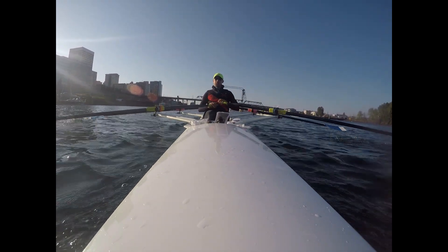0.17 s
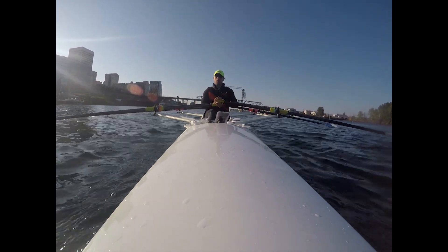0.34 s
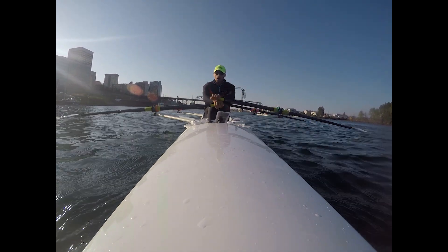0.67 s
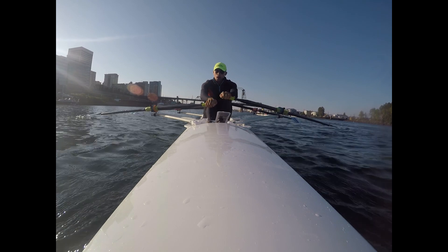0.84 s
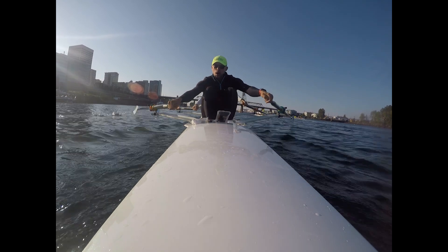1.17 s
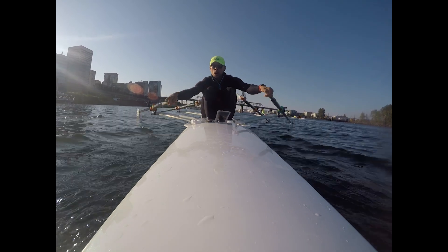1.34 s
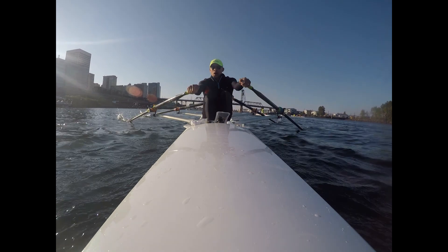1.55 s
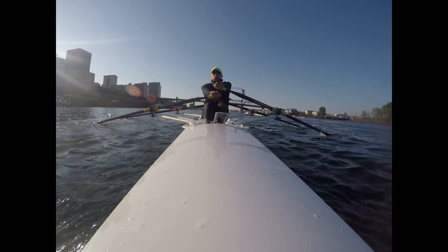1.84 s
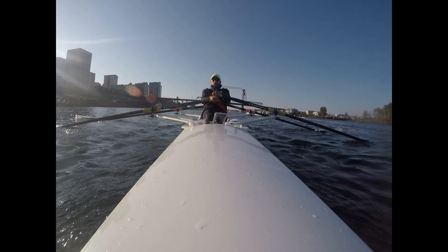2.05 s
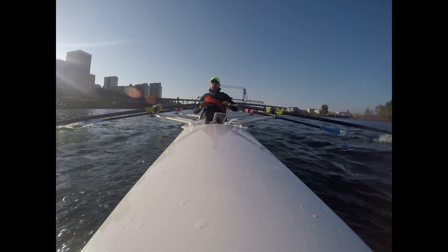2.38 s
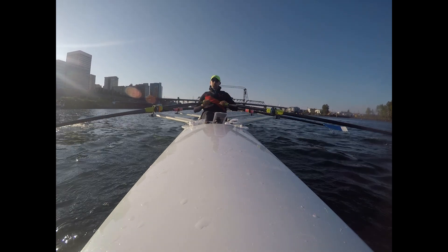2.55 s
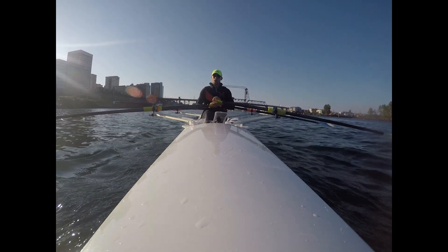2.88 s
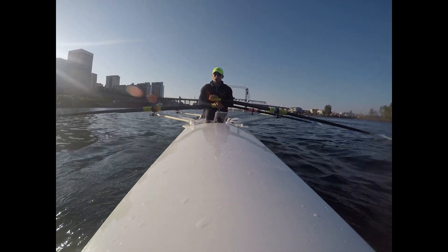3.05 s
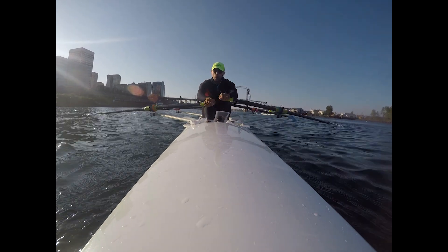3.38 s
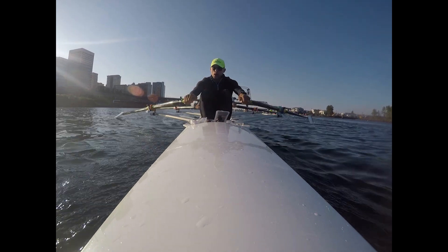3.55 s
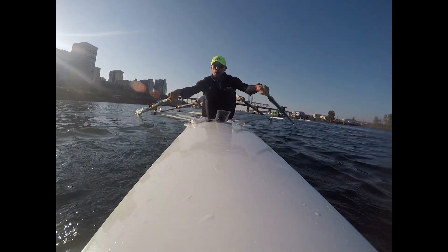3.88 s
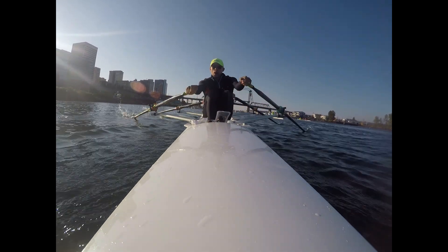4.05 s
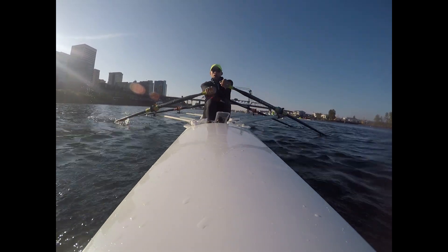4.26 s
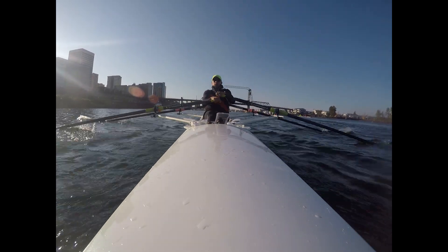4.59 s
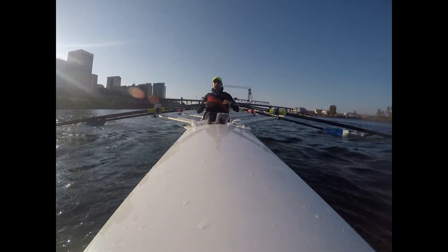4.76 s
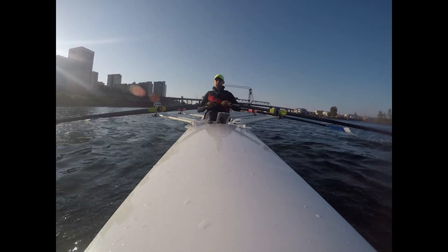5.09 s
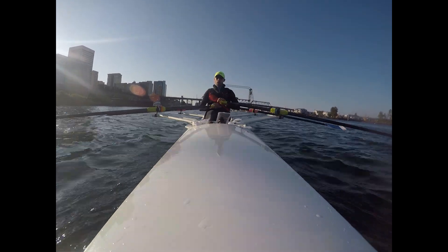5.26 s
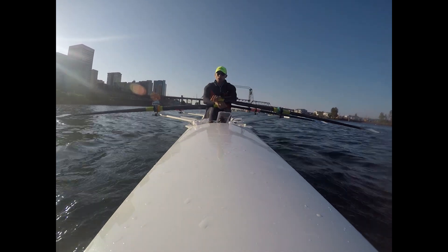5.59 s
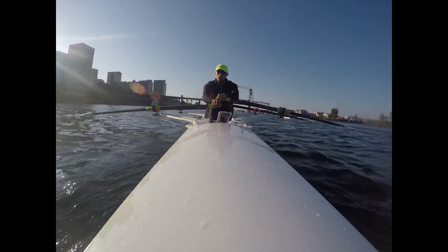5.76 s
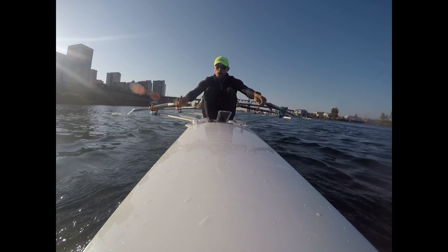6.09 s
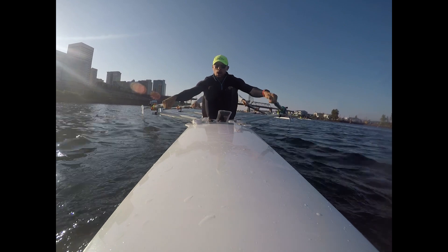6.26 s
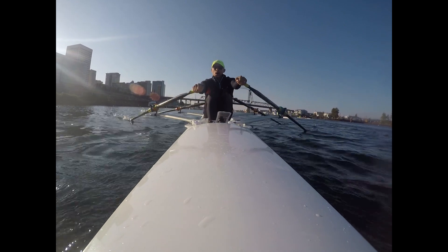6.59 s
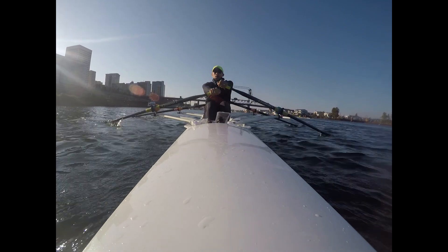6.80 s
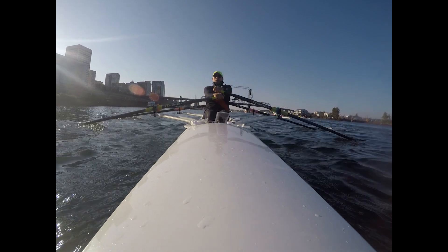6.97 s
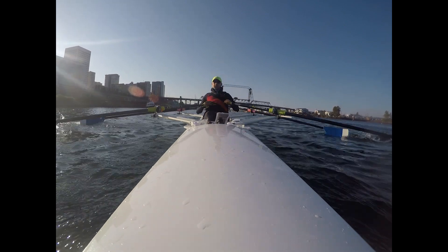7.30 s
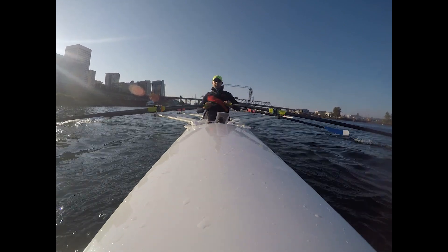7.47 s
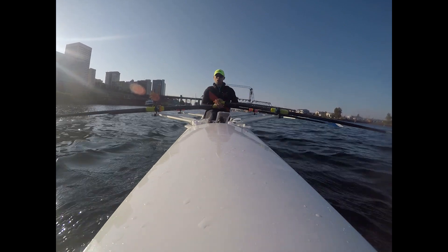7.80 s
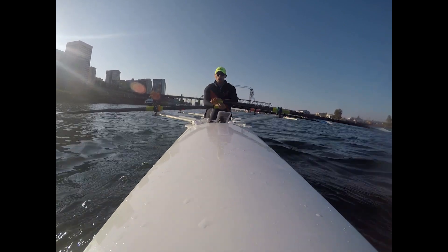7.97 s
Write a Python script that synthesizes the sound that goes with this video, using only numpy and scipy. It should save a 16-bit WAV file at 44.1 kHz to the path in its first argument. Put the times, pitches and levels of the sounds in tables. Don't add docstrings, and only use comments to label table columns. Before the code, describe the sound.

Muffled low rumble and water rushing under a rowing shell, swelling with each stroke, with dull oarlock knocks, hollow booms, bubbling pings and light drips.

```python
import sys
import numpy as np
from scipy import signal
from scipy.io import wavfile
from scipy.ndimage import uniform_filter1d, minimum_filter1d

SR = 44100
rng = np.random.default_rng(int(sys.argv[2]) if len(sys.argv) > 2 else 0)


def voltage_ratio(decibels):
    exponent = np.asarray(decibels, float) / 20
    return 10 ** exponent


def materialize(psi):
    bounded = np.clip(np.atleast_2d(psi).T, -1, 1)
    quanta = np.round(bounded * 32767).astype(np.int16)
    wavfile.write(sys.argv[1], SR, quanta)


N = 358974

# f/Hz, width/Hz, level/dB
DECK_MODES = [(112.2, 30.2, 1), (144, 27, 2), (198.3, 62.8, -3.5), (263.6, 48, -11.5), (316.4, 29, -12.5),
              (369.8, 41, -16), (422, 38.5, -10.5), (467.6, 52, -12.5), (511.2, 80, -14)]
# f/Hz, width/Hz, level/dB
SKIN_MODES = [(707, 85, -1), (875, 170, 0.5), (1060, 200, 1.5), (1324.5, 88, -0.5), (1487, 150, -2),
              (1656, 204, -4.5), (2037, 220, -9)]
# f/Hz, width/Hz, level/dB
MOUNT_MODES = [(2530, 450, -5), (2913, 260, -1), (3100, 280, 2), (3480, 260, -6.5), (3907, 180, -9.5),
               (4780, 240, -19.5)]
# f/Hz, width/Hz, level/dB
HOUSING_MODES = [(4800, 230, 1), (5800, 680, -3.5), (6250, 600, -1), (7420, 2700, -9), (8540, 150, -1.5),
                 (9200, 3700, -6.5), (12800, 3500, -16)]


def in_time(rows):
    t_s, level_db = np.transpose(rows)
    return np.interp(np.arange(N) / SR, t_s, level_db)


def swells(rows, curve):
    t, out = np.arange(N) / SR, np.zeros(N)
    for peak_s, db, rise_s, fall_s in rows:
        rising = 1 + (t - peak_s) / rise_s
        falling = 1 - (t - peak_s) / fall_s
        near = np.where(t < peak_s, rising, falling)
        out = np.maximum(out, db * np.clip(near, 0, 1) ** curve)
    return out


def rms_one(x):
    return x / np.sqrt(np.mean(x ** 2) + 1e-20)


def wander(spread_db, rate_hz):
    hop, settle = 40, 2000
    r = np.exp(-2 * np.pi * rate_hz * hop / SR)
    noise = rng.standard_normal(N // hop + settle + 2)
    slow = signal.lfilter([1], [1, -2 * r, r * r], noise)[settle:]
    return np.interp(np.arange(N) / hop, np.arange(len(slow)), voltage_ratio(spread_db * rms_one(slow)))


def turbulence(gust_db, rate_hz, grain_db):
    grains = voltage_ratio(grain_db * np.minimum(rng.exponential(1, N), 5))
    return rng.standard_normal((2, N)) * wander(gust_db, rate_hz) * grains


def resonate(x, hz, width_hz):
    r = np.exp(-np.pi * width_hz / SR)
    stage = [(1 - r * r) / 2, 0, (r * r - 1) / 2, 1, -2 * r * np.cos(2 * np.pi * hz / SR), r * r]
    return signal.sosfilt([stage, stage], x)


def band(x, low_hz, high_hz):
    return signal.sosfilt(signal.butter(2, [low_hz, high_hz], "band", fs=SR, output="sos"), x)


def body(forces, modes, patchy_db, rate_hz):
    out = 0
    for k, (hz, width_hz, db) in enumerate(modes):
        force = forces[k % 2] * wander(patchy_db, rate_hz)
        warmed = np.r_[force[-SR // 5:], force]
        out = out + voltage_ratio(db) * resonate(warmed, hz, width_hz)
    return out[-N:]


def add_at(out, t_s, sound):
    i = round(t_s * SR)
    out[i:i + len(sound)] += sound[:N - i]


def struck(events, modes, low_hz, high_hz, blow, spread_db):
    attack_s = 0.003
    out, t = np.zeros(N), np.arange(SR // 8) / SR
    for t_s, peak_db, length_s in events:
        force = rng.standard_normal(len(t)) * np.exp(-t / length_s)
        force *= 1 - np.exp(-t / min(attack_s, length_s / 3))
        force[:3] += blow
        strengths = voltage_ratio(spread_db * rng.standard_normal(len(modes)))
        ring = 0
        for k, (hz, width_hz, mode_db) in enumerate(modes):
            gain = (-1) ** k * strengths[k] * voltage_ratio(mode_db)
            ring = ring + gain * resonate(force, hz, width_hz)
        ring = band(ring, low_hz, high_hz)
        add_at(out, t_s, voltage_ratio(peak_db) * ring / np.abs(ring).max())
    return out


def steadied(x, share):
    height = np.sqrt(uniform_filter1d(rms_one(x) ** 2, size=1500) + 0.029)
    return x / height ** share


def gurgles(per_s, size_db):
    out = 0
    for hz, width_hz, db in SKIN_MODES:
        bursts = rng.random(N) < per_s / SR
        sizes = voltage_ratio(db + size_db + 3.5 * np.minimum(rng.exponential(1, N), 3))
        out = out + resonate(bursts * sizes + 1e-18, hz, width_hz * 0.88)
    return out


def shaking():
    # f/Hz, width/Hz, level/dB
    bending_modes = [(29.44, 15.9, -2.5), (51.1, 10.6, 0.5), (69.9, 38.6, -11.5)]
    # t/s, level/dB
    heave = [(0.0, -9), (0.2, -17), (0.79, -22.5), (1.2, -9.5), (1.88, -20), (2.63, -12), (2.72, -20),
             (2.79, -12.5), (3.04, -21.5), (3.11, -15), (4.4, -16), (4.44, -21), (4.85, -12.5), (5.69, -21),
             (6.03, -12.5), (6.87, -20.5), (7.44, -14.5), (8.14, -18.5)]
    # t/s, level/dB
    flow = [(0.0, -39.5), (0.27, -41.5), (1.09, -32.5), (1.27, -41.5), (1.56, -45), (2.36, -32.5),
            (2.54, -41), (2.76, -42), (3.56, -33), (3.94, -43), (4.83, -32.5), (5.1, -42.5), (6.12, -34.5),
            (6.28, -40.5), (6.6, -44), (7.25, -32), (7.51, -41.5), (8.14, -38)]
    # peak t/s, strength/dB, build-up/s, release/s
    jolts = [
        (1.13, 14, 0.22, 0.2),
        (2.36, 14.5, 0.23, .08),
        (2.44, 9, 0.11, 0.17),
        (3.75, 13, 0.27, 0.15),
        (4.74, 16, 0.098, 0.051),
        (4.92, 14, 0.23, 0.23),
        (5.09, 3.5, 0.11, 0.087),
        (6.22, 14, 0.32, 0.14),
        (7.23, 13, 0.1, 0.07),
        (7.41, 16.5, 0.25, 0.2),
    ]
    # peak t/s, strength/dB, build-up/s, release/s
    waves = [(0.45, 1, .05, .05), (1.64, 2, .02, .06), (1.84, 6, 0.04, 0.095), (2.12, 1.5, .03, 0.033),
             (2.9, 2.5, 0.11, 0.045), (3.18, 2.5, 0.037, 0.04), (4.22, 2, .08, .06), (4.36, 4, 0.14, 0.042),
             (5.09, 1, .06, 0.07), (5.22, 1, 0.066, 0.088), (5.45, 0.5, 0.046, 0.065),
             (5.75, 3, 0.11, 0.091), (6.87, 4.5, 0.049, 0.057), (7.73, 3.5, .02, 0.19),
             (7.99, -0.5, .04, 0.065)]
    # deepest t/s, depth/dB, settling/s, recovery/s
    lulls = [
        (0.2, 4.5, .4, .5),
        (1.4, 0, .12, .3),
        (2.65, 4.5, .1, 0.089),
        (4.15, 1.5, .2, 0.4),
        (5.3, 6, .15, 0.43),
        (6.45, 0.5, .1, 0.22),
        (7.7, 3.5, .15, 0.16),
        (8.05, 3, .2, 0.26),
    ]
    jolt_db = swells(jolts, curve=1.35)
    flow_db = in_time(flow)
    flow_db = flow_db - flow_db.mean() + swells(waves, curve=0.82)

    bending_db = in_time(heave) + 0.26 * jolt_db
    deck_db = -23 + 0.51 * flow_db + 0.95 * jolt_db - swells(lulls, curve=0.88)
    skin_db = -38.5 + flow_db + 0.19 * jolt_db
    mount_db = -51.5 + 0.9 * flow_db + 0.15 * jolt_db

    swell = body(turbulence(0.9, 6.7, 0.1), bending_modes, patchy_db=1.36, rate_hz=3.0)
    bending = steadied(swell - uniform_filter1d(swell, size=2200), share=0.73)
    wash = turbulence(1.1, 28, 2.6)
    deck = body(wash, DECK_MODES, patchy_db=2.5, rate_hz=8.0)
    skin = body(wash, SKIN_MODES, patchy_db=2.0, rate_hz=11) + gurgles(per_s=6, size_db=30.5)
    mount = body(wash, MOUNT_MODES, patchy_db=1.5, rate_hz=45)

    low = voltage_ratio(bending_db) * rms_one(bending) + voltage_ratio(deck_db) * rms_one(deck)
    high = voltage_ratio(skin_db) * rms_one(skin) + voltage_ratio(mount_db) * rms_one(mount)
    return low + high


def hiss():
    # peak t/s, strength/dB, build-up/s, release/s
    hiss_swells = [(1.06, 6, .8, 0.091), (2.36, 9.5, 0.78, 0.04), (2.54, 5.5, .06, .04), (2.72, 5, 0.022, .09),
                   (3.06, 5.5, 0.025, .05), (3.61, 5.5, 0.76, .45), (4.79, 9, .9, .18), (5.73, 4.5, 0.27, .3),
                   (6.18, 5, 0.97, 0.042), (6.4, 6, .1, .05), (7.34, 9, 1.0, 0.077), (8.3, 4.5, 0.74, .1)]
    air = body(turbulence(0.35, 30, 0.8), HOUSING_MODES, patchy_db=0.3, rate_hz=11)
    air = band(air, 3800, 13000)
    return voltage_ratio(-71 + swells(hiss_swells, curve=1.4)) * rms_one(air)


def ticks():
    # t/s, peak/dB
    drops = [(0.0238, -51), (1.425, -51), (1.037, -40.5), (1.1278, -45), (1.1688, -47.5), (1.2428, -52),
             (2.3047, -48), (2.4882, -57), (2.5122, -50), (2.5331, -52), (2.7268, -48), (3.047, -50),
             (3.5448, -57), (3.5766, -50), (3.7039, -53), (3.7507, -54), (3.9162, -45.5), (4.8196, -49),
             (4.8746, -44), (4.9945, -54), (6.003, -47), (6.195, -56), (6.2198, -54), (6.3965, -47),
             (7.2888, -50), (7.3166, -47), (7.3602, -50), (7.4006, -49), (7.4185, -54), (7.4405, -51)]
    events = [(t_s, db - 2.5, 0.003) for t_s, db in drops]
    return struck(events, HOUSING_MODES, 3600, 10500, blow=1.1, spread_db=2.2)


def pings():
    # t/s, peak/dB, f/Hz
    bubbles = [(0.443, -18.5, 1140), (0.67, -23, 1060), (0.744, -17, 1115), (2.896, -24, 2040),
               (1.125, -13, 859), (1.168, -21, 866), (3.155, -24, 3100), (1.634, -18.5, 1066),
               (1.809, -19, 970), (2.301, -5.5, 954), (2.366, -2.5, 1494), (3.185, -12.5, 1126),
               (3.344, -11, 1085), (3.387, -16, 1130), (3.611, -12, 918), (3.701, -10, 950),
               (4.472, -17, 900), (4.701, -25, 965), (5.195, -23, 2040), (4.872, -20, 970),
               (5.703, -17, 980), (6.092, -13, 885), (6.201, -4.5, 1354), (6.836, -26, 1060),
               (6.995, -16, 1095), (7.171, -22, 925), (7.224, -7, 875), (5.445, -19, 1060),
               (5.258, -22, 2040), (7.401, -7, 1330)]
    out, t = np.zeros(N), np.arange(SR // 10) / SR
    for t_s, db, hz in bubbles:
        t60_s = 45 / hz
        shape = (1 - np.exp(-t / 0.0035)) * voltage_ratio(db - 2.5 - 60 * t / t60_s)
        add_at(out, t_s, shape * np.sin(2 * np.pi * hz * t * (0.98 + 1.1 * t)))
    return out


def knocks():
    # t/s, peak/dB, bright part/dB
    hull_knocks = [(0.98, -16, -11), (1.052, -23, -8), (1.126, -7, -5.5), (1.136, 4, -29), (1.189, -10, -27),
                   (1.239, -7, -15.5), (2.112, -20, -8), (2.208, -8.5, -17.5), (2.302, -11.5, -12),
                   (2.363, -0.5, -13), (3.608, -9, -11.5), (3.694, -7, -20), (3.752, -7.5, -16.5),
                   (4.722, -10, -15), (4.813, -2.5, -15), (4.871, -2.5, -10.5), (4.932, -10, -8.5),
                   (4.956, -6.5, -32), (5.956, -17.5, -24), (6.101, -9, -17.5), (6.195, -6, -7.5),
                   (6.218, -10.5, -13.5), (7.15, -19.5, -11.5), (7.17, -13.5, -16), (7.225, -7.5, -21),
                   (7.309, -7, -12), (7.355, -0.5, -19), (7.395, -7.5, -10), (7.422, -15, -9),
                   (7.473, -16.5, -18),
                   (0.74, -23.5, 1), (0.893, -17.5, -13), (1.168, -19.5, -5.5), (1.422, -22.5, -11),
             (1.504, -16, -22), (2.186, -12.5, -20), (2.468, -17, -15), (2.511, -17, -10),
             (2.531, -16, -17), (2.723, -16.5, -21), (2.39, -8.5, -8), (3.09, -15.5, -11.5),
             (3.174, -32, -10), (3.344, -19.5, -10), (3.724, -15, -1.5), (3.912, -30, -3),
             (4.373, -13, -37), (4.772, -25, -3), (4.993, -15.5, -14), (5.417, -23, -8), (5.677, -25, -10),
             (5.698, -28.5, -0.5), (5.744, -25.5, 6.5), (5.843, -25, -6), (5.932, -18, -14),
             (6.067, -22, -7), (6.382, -36, -19), (6.415, -21.5, -21), (6.716, -20, -11),
             (7.976, -23.5, -8)]
    # f/Hz, width/Hz, level/dB
    bracket_modes = [(4670, 350, -14.5)]
    t_s, peak_db, bright_db = np.transpose(hull_knocks)
    thin_db = -24.5 + 0.67 * (bright_db + 16) - 0.11 * (peak_db + 13.5)
    contact_s = np.full(len(t_s), 0.012)

    dull_hits = zip(t_s, peak_db - 0.6, contact_s * 2.47)
    bright_hits = zip(t_s, peak_db + bright_db + 0.2, contact_s * 1.8)
    thin_hits = zip(t_s, peak_db + thin_db, contact_s * 0.83)
    dull = struck(dull_hits, DECK_MODES[4:], 260, 720, blow=11.8, spread_db=4.5)
    bright = struck(bright_hits, SKIN_MODES, 560, 3700, blow=2.5, spread_db=3.0)
    thin = struck(thin_hits, MOUNT_MODES + bracket_modes, 2400, 12000, blow=2.2, spread_db=2.1)
    return dull + bright + thin


def thumps():
    # t/s, peak/dB, f/Hz, t60/s
    booms = [(0.959, -2, 108.5, 0.15), (1.063, -10, 105, 0.091), (1.126, 6, 106, 0.23),
             (1.513, 4, 138, 0.16), (2.203, -3.5, 150, 0.19), (2.398, -7, 204.5, 0.37),
             (2.723, -3.5, 143, 0.17), (3.054, -1, 141.6, 0.15), (3.201, -5, 96, 0.099),
             (3.616, 3.5, 221, 0.14), (3.756, -9, 146.6, 0.5), (4.245, -13, 108, 0.26),
             (1.2, -7, 270, 0.15), (4.815, -8, 123, 0.33), (4.871, -10, 106, 0.34),
             (5.081, -7.5, 117, 0.27), (7.6, -6.5, 75.4, 0.49), (5.79, -8, 149, 0.13),
             (5.873, -15, 125, 0.18), (6.014, -8, 145, 0.053), (6.093, -19, 131, 0.097),
             (6.12, -9, 298, 0.15), (6.234, -2, 126.3, 0.22), (6.359, -6.5, 128, 0.22),
             (6.438, -4, 137.2, 0.21), (7.181, 4, 151, 0.11), (7.247, -2.5, 141, 0.16),
             (7.877, -15, 120, 0.21), (7.93, -1, 113, 0.14), (7.999, -6, 120.6, 0.17)]
    out, t = np.zeros(N), np.arange(SR // 3) / SR
    for t_s, db, hz, t60_s in booms:
        shape = (1 - np.exp(-t / 0.011)) ** 2 * voltage_ratio(db + 1.0 - 60 * t / t60_s)
        add_at(out, t_s, shape * np.sin(2 * np.pi * hz * t))
    return out


def scene():
    return (shaking() + hiss() + ticks() + pings() + knocks() + thumps())[None]


def top_cut(x):
    return signal.sosfilt(signal.butter(12, 15000, fs=SR, output="sos"), x)


def record(dry):
    ceiling = 0.94
    room = minimum_filter1d(np.minimum(1, ceiling / (np.abs(dry) + 1e-9)), size=700)
    limited = dry * uniform_filter1d(room, size=350)
    return top_cut(limited)


dry = scene()
out = record(dry)
materialize(out)
```